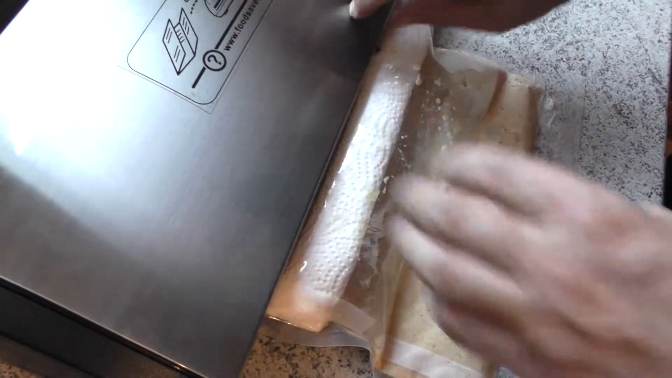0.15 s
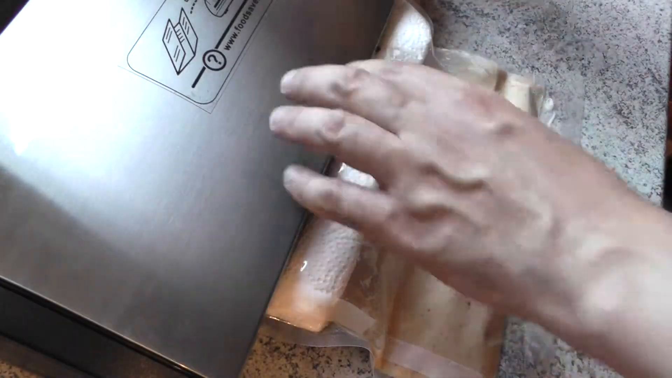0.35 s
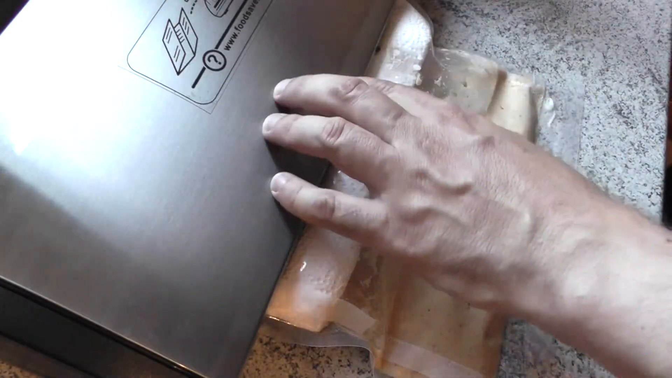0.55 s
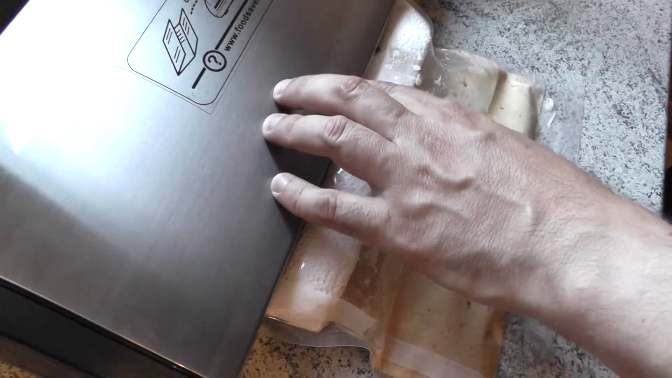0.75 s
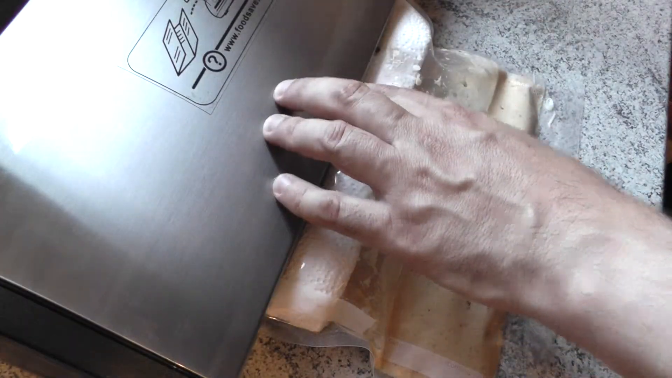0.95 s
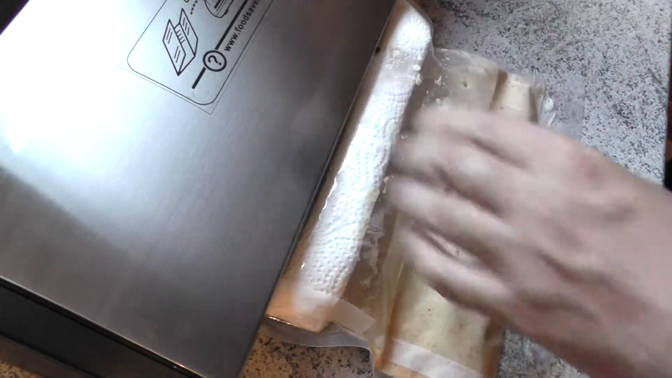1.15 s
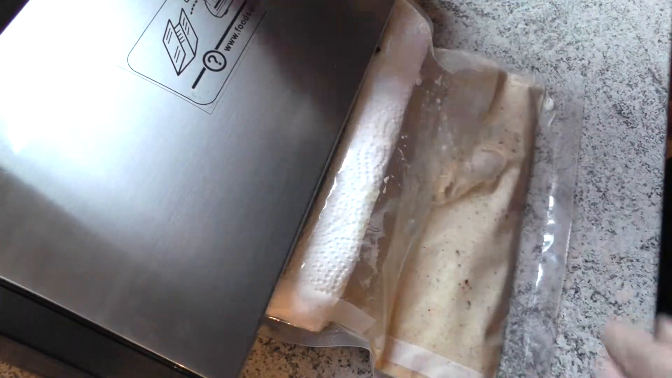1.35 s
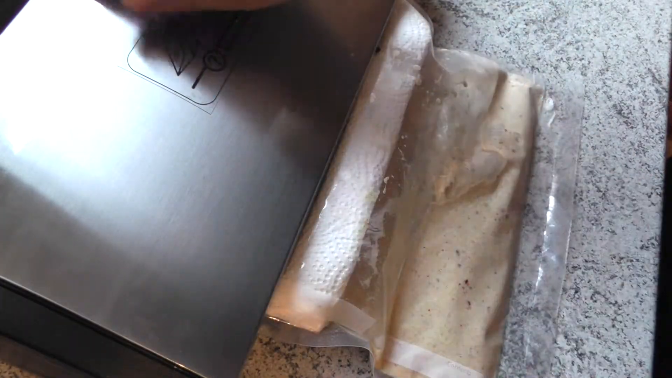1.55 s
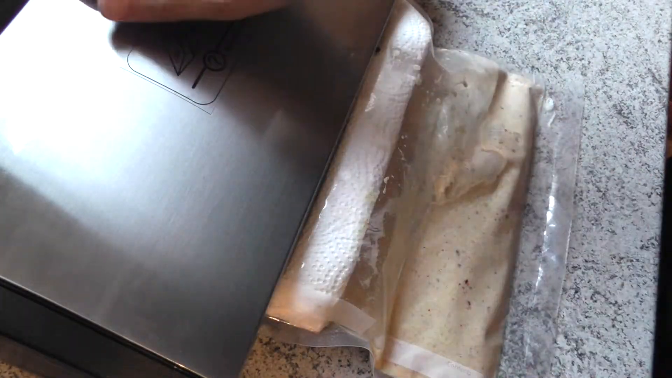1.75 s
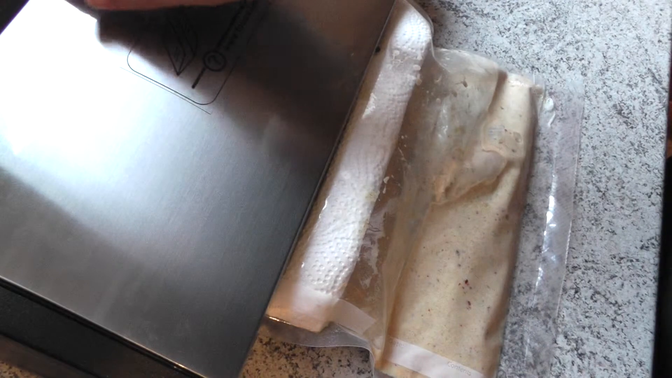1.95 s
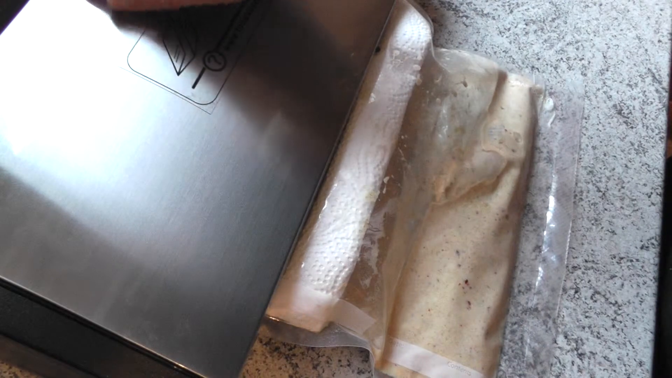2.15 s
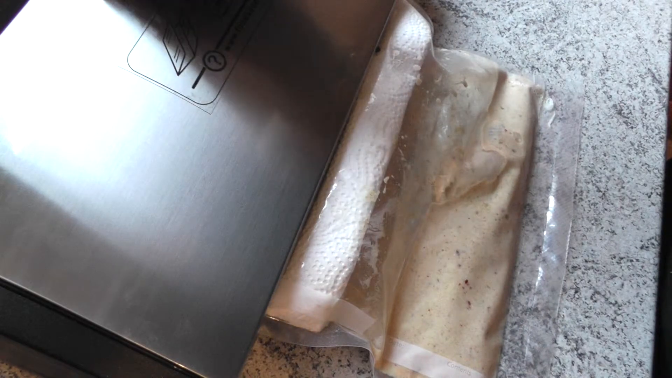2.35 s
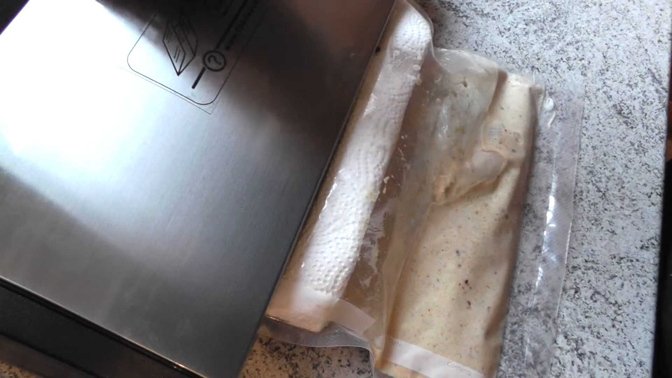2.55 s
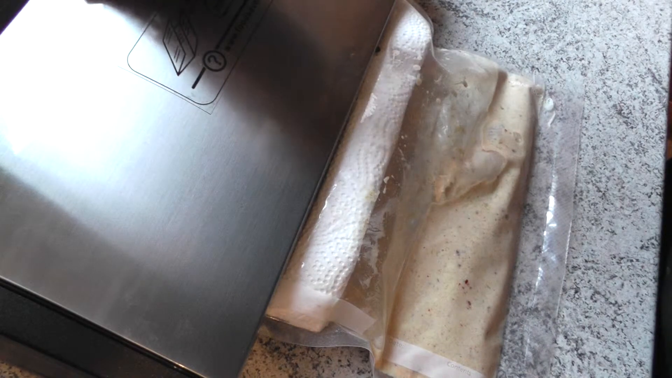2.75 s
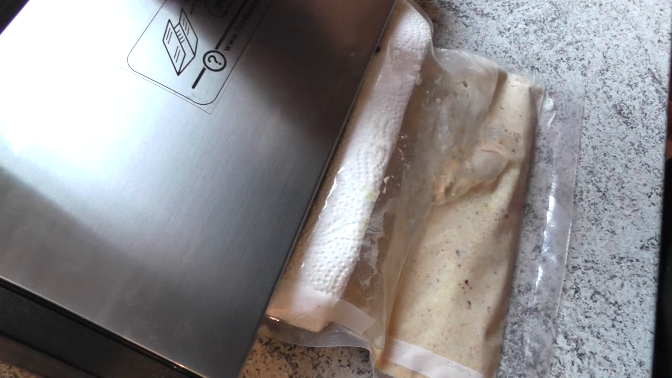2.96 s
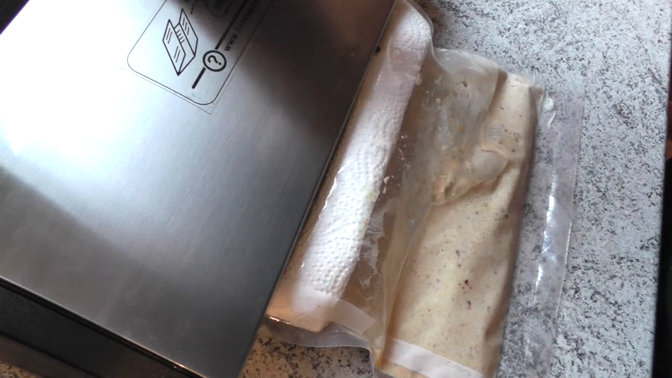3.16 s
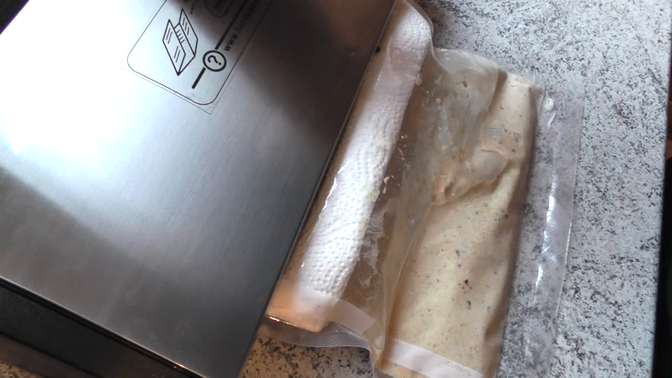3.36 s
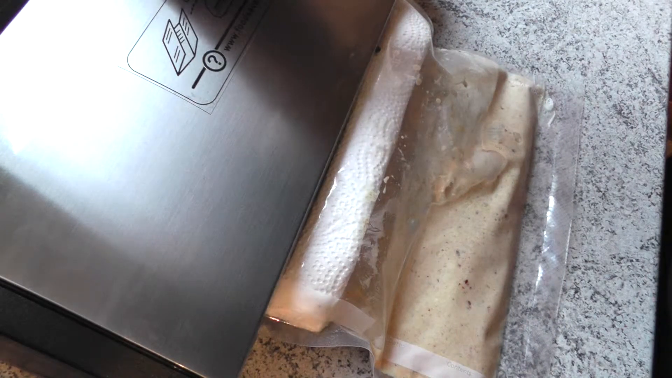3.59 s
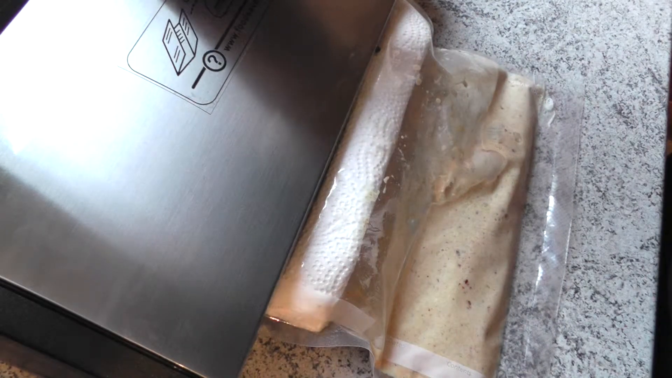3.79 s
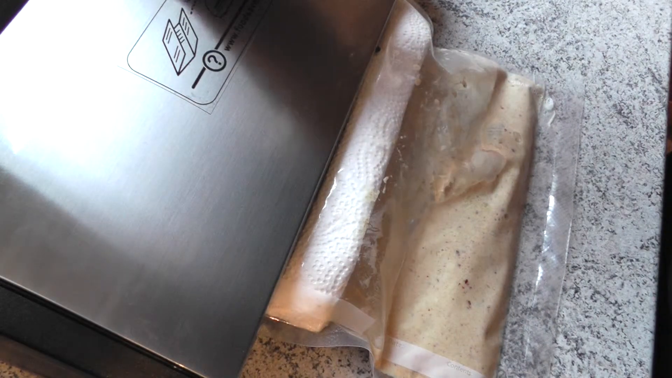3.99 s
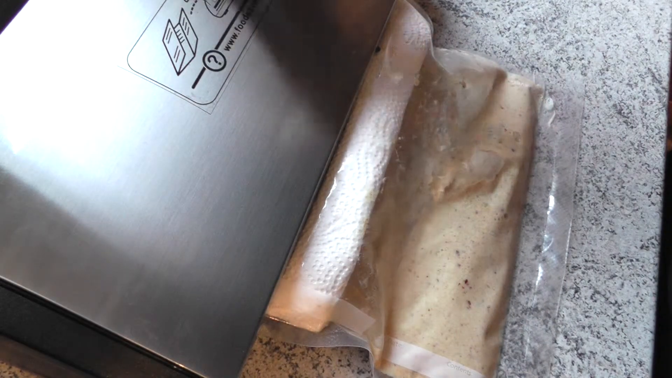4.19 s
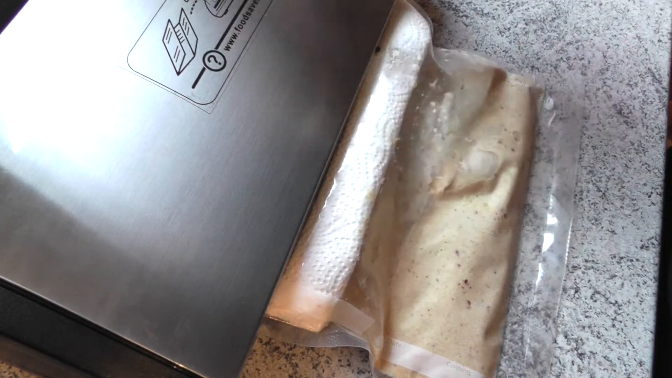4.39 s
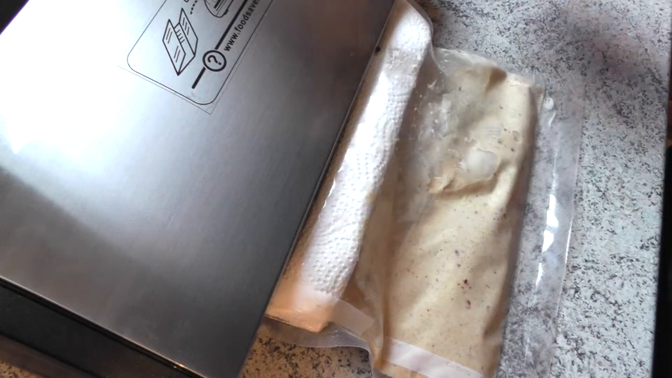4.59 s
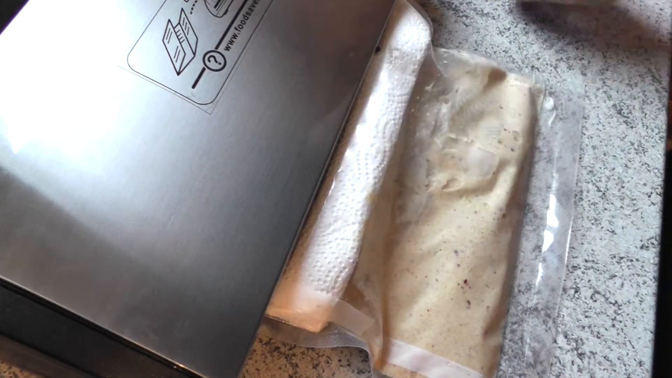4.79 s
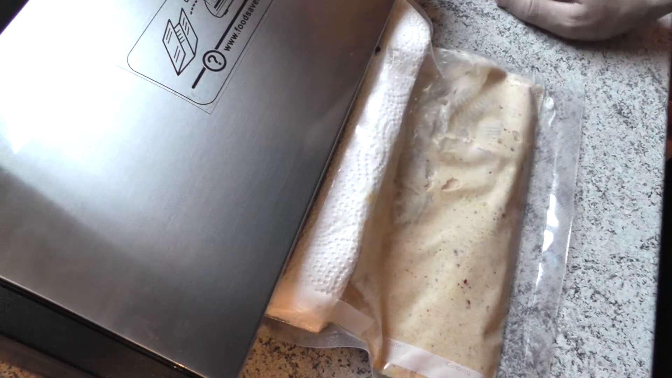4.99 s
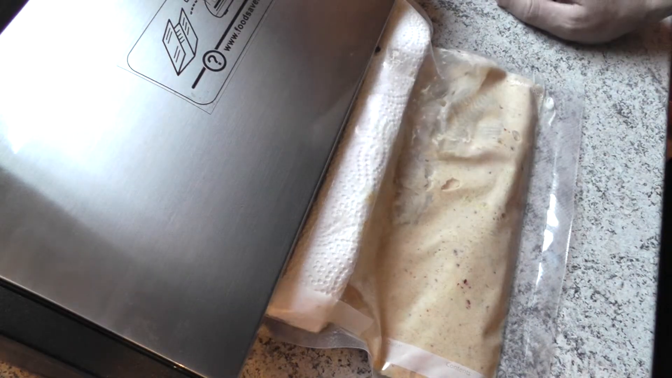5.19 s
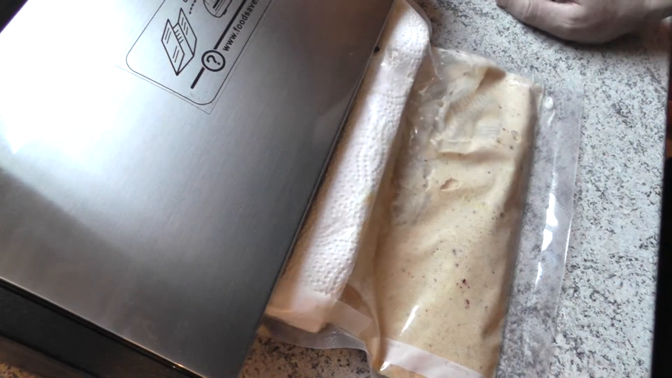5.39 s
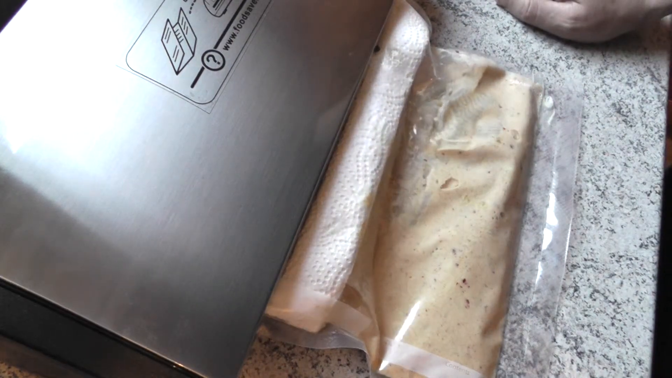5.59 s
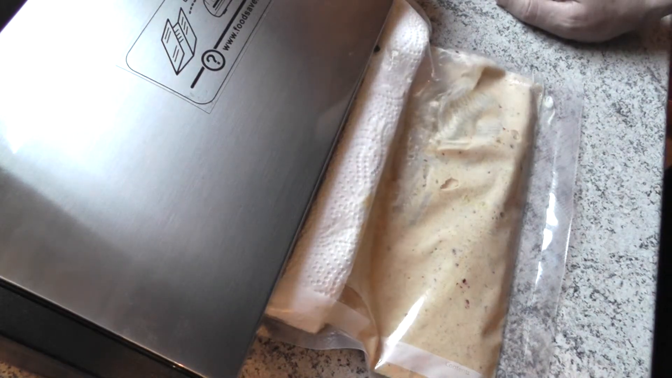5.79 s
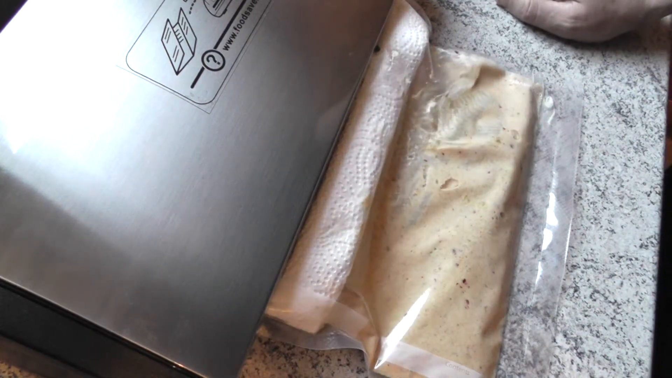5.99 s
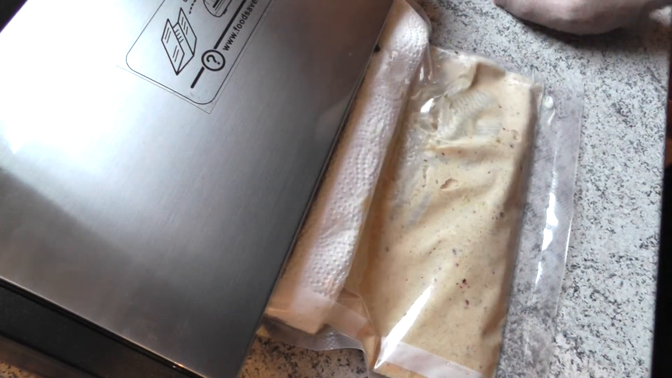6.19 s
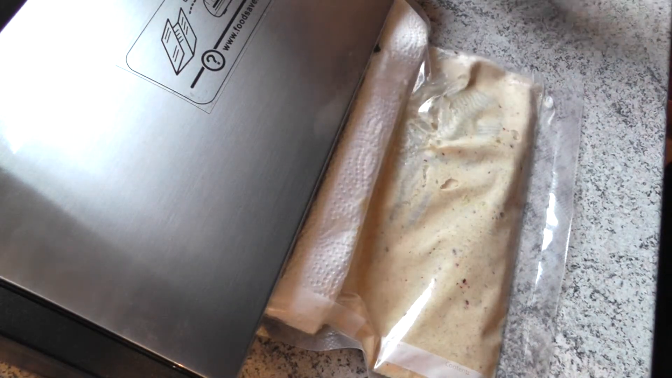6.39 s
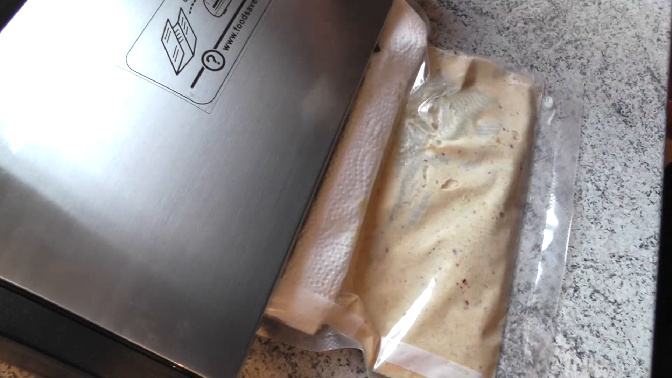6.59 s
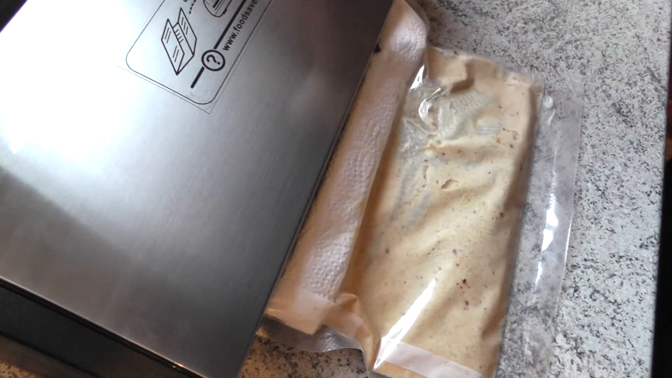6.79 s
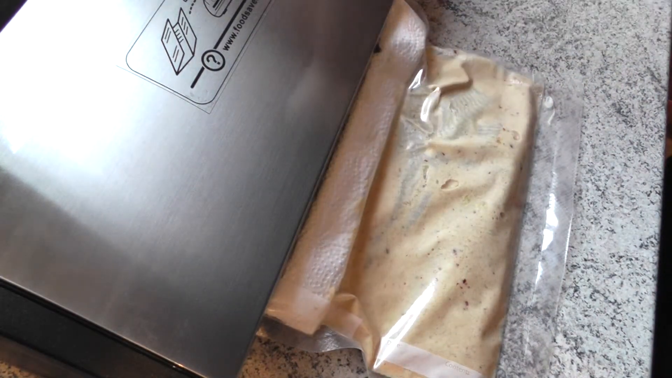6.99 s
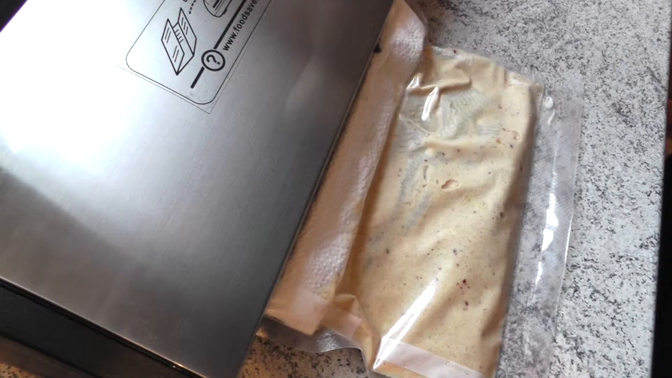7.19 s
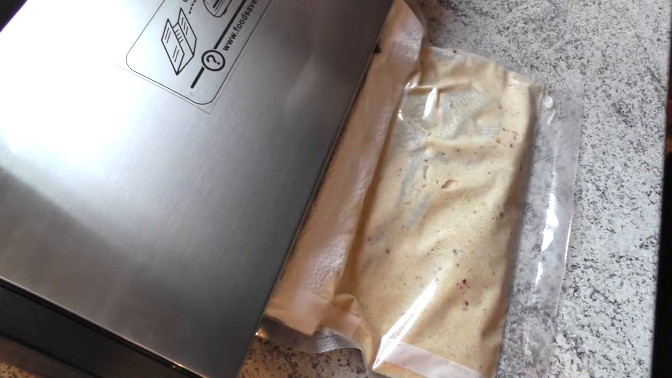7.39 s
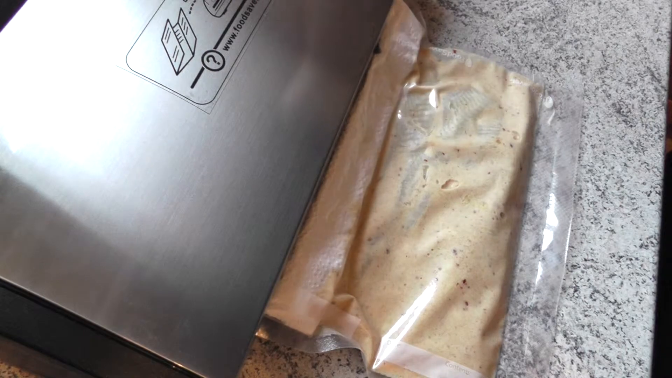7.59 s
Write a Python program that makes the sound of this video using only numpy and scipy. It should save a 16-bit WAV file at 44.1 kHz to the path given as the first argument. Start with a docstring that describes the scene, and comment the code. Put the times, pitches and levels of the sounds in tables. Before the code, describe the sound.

Close microphone in a kitchen with short reverberation and very faint room air. From 0 to 0.7 s a hand shifts and lightly thumps a steel lid. At about 0.7 s comes a bright click, then at 0.87 s the loudest latch snap, hard and woody, with a tiny metallic ping at 0.93 s. Near quiet follows, with small ticks around 1.9-2.1 and 2.7-2.9 s, light skin swishes and a slowly growing low rub. At 3.6 s there is a tick, at 3.75 s a dull low bump, and at 3.84 s the pump starts abruptly: a steady low drone near 38 turns per second, rough with rapid valve clatter, thin motor whine and fluttering exhaust hiss. The airflow sound soon tightens into a drier, slightly louder rattle. A short deep thump hits at 5.4 s. From about 7 s the pump strains, its pitch sagging slightly, buzzing harder until the end at about 7.6 s.

```python
"""Vacuum sealer on a worktop

Close by, a hand presses a steel lid until it latches: damped blows, pings and thumps over rubbing skin.
Then a piston pump starts: modal hum, three valve slaps a turn, motor whine and puffs of exhaust noise.
The strain grows as the bag empties, delaying the slaps, over faint room air and kitchen reverberation."""
import sys
import numpy as np
from scipy import signal
from scipy.fft import rfft, irfft, next_fast_len
from scipy.io import wavfile

SR = 44100
rng = np.random.default_rng(int(sys.argv[2]) if len(sys.argv) > 2 else 0)


def dump(signal):
    """Clip the signal to [-1, 1] and save it as 16-bit WAV at the path in sys.argv[1]."""
    limited = np.clip(np.atleast_2d(signal).T, -1, 1)
    pcm = np.round(limited * 32767).astype(np.int16)
    wavfile.write(sys.argv[1], SR, pcm)


N = 337365
TIME = np.arange(N) / SR
START = 3.8436  # first stroke of the pump, s
# crank speed of the pump: (time [s], speed [turns/s])
SPEED = [(3.84, 37.9), (4.6, 37.9), (5.2, 37.95), (6.5, 37.95), (7.0, 37.89), (7.3, 37.75), (7.65, 37.3)]


def amp(db):
    """Decibel law: a level in dB becomes an amplitude ratio."""
    return 10 ** (np.asarray(db) / 20)


def unit(x):
    """Equal-power reference: scales a signal to rms 1."""
    return x / np.sqrt(np.mean(x ** 2) + 1e-20)


def follow(rows):
    """Linear interpolation: each column of a time curve at every sample."""
    s, *columns = np.transpose(rows)
    return [np.interp(TIME, s, c) for c in columns]


def read(points, hz):
    """Spectral interpolation: joins the points on a log-frequency axis."""
    f, value = np.transpose(points)
    return np.interp(np.log(hz + 1), np.log(f + 1), value)


def colour(x, points):
    """Linear filtering: shapes a spectrum that falls away steeply beyond its end points."""
    size = next_fast_len(len(x))
    hz = np.fft.rfftfreq(size, 1 / SR)
    low_skirt = np.minimum(hz / points[0][0], 1) ** 4
    high_skirt = np.minimum(points[-1][0] / (hz + 1), 1) ** 4
    gain = amp(read(points, hz)) * low_skirt * high_skirt
    return irfft(rfft(x, size) * gain, size)[:len(x)]


def noise(points):
    """Coloured noise: white noise filtered to a given spectrum, at rms 1."""
    return unit(colour(rng.standard_normal(N), points))


def wander(rate_hz):
    """Random modulation: noise under a Gaussian low-pass, rms 1 before interpolation."""
    spectrum = rfft(rng.standard_normal(N // 32))
    hz = np.arange(len(spectrum)) * SR / N
    slow = unit(irfft(spectrum * np.exp(-(hz / rate_hz) ** 2)))
    return np.interp(TIME, np.linspace(0, N / SR, len(slow)), slow)


def add(mix, s, sound):
    """Superposition: adds a sound to the mix from time s."""
    part = mix[max(round(s * SR), 0):][:len(sound)]
    part += sound[:len(part)]


def pump(motor_lead=0.027, jitter=0.00069, loaded_db=1.55, free_db=-0.5):
    """Crank-driven sources: hum, valves and air share one crank phase, while the whine adds drive tones of
    fixed pitch; all vary with flow and strain."""
    flow_fade_s, strain_grow_s = 0.55, 0.27
    full_strain_s = 7.65  # time at which the growing strain reaches 1
    start_strain, start_ease_s = 0.46, 0.038  # the first strokes strain as the piston gets moving
    speed, = follow(SPEED)
    turns = np.cumsum(speed) / SR
    turns = turns - turns[round(START * SR)] + jitter * wander(12)
    running_s = np.maximum(TIME - START, 0)
    flow = np.exp(-running_s / flow_fade_s)
    strain = start_strain * np.exp(-running_s / start_ease_s)
    strain = strain + np.exp((TIME - full_strain_s) / strain_grow_s)
    pumping = np.clip((TIME - START) / 0.0029, 0, 1)
    whining = np.clip((TIME - START + motor_lead) / .004, 0, 1)  # heard just before the first stroke
    works = pumping * exhaust(turns) + clatter(turns, flow, strain) + whining * whine(turns)
    works_db = loaded_db + (free_db - loaded_db) * flow  # louder as the flow dies away
    return pumping * hum(turns, flow, strain) + amp(works_db) * works


def hum(turns, flow, strain, level_db=-25.5, waver_db=1.48, count=38):
    """Modal excitation: two kicks a turn drive housing modes that colour the crank harmonics."""
    # piston kicks: (place [share of a turn], lag at strain 1 [share of a turn],
    # gain at strain 1 [dB], gain at full flow [dB])
    kicks = [(0.133, -0.0034, 2, -2), (0.544, -0.033, 1.7, -2.5)]
    # housing modes: (frequency [Hz], width [Hz], signed swing from first kick [ratio],
    # signed swing from second kick [ratio])
    housing = [(77.4, 35.2, -0.47, -0.41), (101.0, 39.2, 0.91, 0.25), (260, 20, 0.013, 0.12),
               (355.2, 55, 0.25, -0.49), (416, 97, 0.071, 0.63), (491.4, 29.3, -0.63, 0.56),
               (584.8, 16.9, 0.35, 0.58), (679.6, 183, -0.88, -0.069), (715.4, 114.7, 1.315, 0.048),
               (936.5, 11, 0.2, -0.42), (1022, 22.7, 0.228, -0.24), (1136, 35, 0.26, -0.31),
               (1150, 14, -0.064, 0.334), (1382, 180, 0.00097, -0.011)]
    out = np.zeros(N)
    ring_hz, width_hz, *swings = np.transpose(housing)
    hz = np.arange(1, count + 1)[:, None] * SPEED[2][1]
    modes = 1 / (1 + 1j * (hz ** 2 - ring_hz ** 2) / (hz * width_hz))
    waver = [amp(waver_db * wander(1.5)) for _ in range(count)]
    for (share, lag, strain_db, flow_db), swing in zip(kicks, swings):
        crank = np.exp(2j * np.pi * (turns - share - lag * strain))
        harmonic = amp(strain_db * strain + flow_db * flow)
        for answer, gain in zip(modes @ swing, waver):
            harmonic = harmonic * crank  # one harmonic higher
            out += gain * (answer * harmonic).real
    return amp(level_db) * out


def clatter(turns, flow, strain, level_db=-32, edge_db=-2, wet_db=-5, uneven=0.073):
    """Periodic impacts: valve flaps slap at set crank angles, later and with more edge under strain."""
    # valve slaps: (place [share of a turn], relative level [dB], decay [s],
    # lag at strain 1 [share of a turn])
    slap_rows = [(0.041, -5.5, 0.0011, 0.0477), (.13, -6, 0.0016, 0.0376), (.51, -12, .0009, 0.022)]
    # rattle near vacuum: (frequency [Hz], relative level [dB])
    loaded_spectrum = [(1250, -8), (1400, -4.5), (1700, -6.5), (1950, -2.5), (2250, -7.5), (2500, -13),
                       (2850, -5.5), (3150, -7.5), (3500, -13), (3800, -12.5), (4300, -17.5), (5400, -22.5),
                       (6500, -23.5), (7000, -24)]
    # rattle while air flows freely: (frequency [Hz], relative level [dB])
    free_spectrum = [(1250, 6.5), (1550, -9), (1900, -9.5), (2300, -8.5), (2900, -13.5), (3300, -10.5),
                     (3800, -5), (4300, -24.5), (5400, -25.5), (7000, -22.5)]
    slaps, t = np.zeros(N), np.arange(SR // 40) / SR
    for share, db, decay, lag in slap_rows:
        angle = turns - share - lag * strain
        offset = ((angle + .5) % 1 - .5) * SR / SPEED[2][1]  # samples from the nearest slap
        pulses = np.exp(-offset ** 2 / 2) * (angle > -.5) * (1 + uneven * wander(40))
        slap = unit(rng.standard_normal(len(t)) * t * np.exp(-t / decay))  # swells, then dies
        slaps += amp(db) * signal.oaconvolve(pulses, slap)[:N]
    slaps = slaps + amp(wet_db) * kitchen(slaps)
    out = flow * colour(slaps, free_spectrum) + (1 - flow) * colour(slaps, loaded_spectrum)
    out += amp(edge_db) * strain ** 2 * colour(slaps, [(2200, -11), (3100, -3), (4000, -28)])
    return amp(level_db) * out / np.std(out[TIME > START])


def whine(turns, waver=0.045, brush_db=-47):
    """Tonal machine noise: crank multiples and fixed drive tones over the hiss of the brushes."""
    # motor tones: (multiple of crank speed [ratio], relative level [dB])
    motor = [(100, -51.5), (108, -60.5)]
    # drive whistles of fixed pitch: (frequency [Hz], relative level [dB])
    drive = [(1972, -36), (5728, -58), (5916, -58.5)]
    tones = [(round(k) * turns, db) for k, db in motor]
    tones += [(hz * TIME, db) for hz, db in drive]
    lines = np.zeros(N)
    for cycles, db in tones:
        wavering = 1 + waver * wander(19)
        lines += amp(db) * np.sqrt(2) * wavering * np.cos(2 * np.pi * cycles)
    brushes = noise([(400, 2.5), (1000, -11), (2000, -17), (4000, -10.5), (7000, -21), (15000, -18.0)])
    return lines + amp(brush_db) * brushes


def exhaust(turns, hiss_db=-46, rush_db=-45, flutter_db=1, whistle_flutter_db=3):
    """Modulated flow noise: the crank gates hiss and narrow-band whistles over a low rush of air."""
    # exhaust hiss: (frequency [Hz], relative level [dB])
    hiss_spectrum = [(3000, 7.5), (5000, -7), (6500, -8), (7300, -6), (8500, 0.5), (9200, -14),
                     (10300, -11.5), (11000, 1.5), (13100, -13), (14000, -2), (14400, -22), (15800, -25)]
    # air flow over one turn: (place [share of a turn], relative level [dB])
    puff_curve = [(.05, -13), (.16, 0), (.32, 1), (.45, -5), (.55, -4), (.64, -13)]
    # faint fluttering outlet whistles: (frequency [Hz], width [Hz], relative level [dB])
    whistles = [(7190, 300, -59), (7550, 87, -53), (8630, 350, -58.5), (13500, 330, -67), (13800, 220, -58)]
    share, flow_db = np.transpose(puff_curve)
    puffs = amp(np.interp(turns % 1, share, flow_db, period=1) + flutter_db * wander(50))
    rush = noise([(40, -7), (125, -11), (220, -13), (480, 4), (1000, 5),
                  (1900, -8), (2400, -37), (3000, -2), (4500, -14)])
    air = amp(hiss_db) * noise(hiss_spectrum)
    for hz, width, db in whistles:
        whistle = signal.lfilter(*signal.iirpeak(hz, hz / width, SR), rng.standard_normal(N))
        air += amp(db + whistle_flutter_db * wander(25)) * unit(whistle)
    return puffs * air + np.sqrt(puffs) * amp(rush_db) * rush


def knocks(crack=3):
    """Impact response: a crack and short noise rattle excite the case; heavy is deeper, hard brighter."""
    # knocks and ticks on lid and case: (time [s], peak level [dB], weight as bass gain [dB],
    # hardness as treble slope [dB/octave], decay [s])
    blow_rows = [(0.249, -42.5, 9, -7, 0.0073), (0.529, -40.5, -16, -5, 0.0023),
                 (0.564, -34.5, 3, 0.5, 0.0043), (0.6, -36, 2, -2, 0.014), (0.713, -15.5, 3, 4.5, 0.0046),
                 (0.82, -27, 9, 1, 0.0031), (0.865, -25, 21, 4, 0.0058), (0.871, -9.5, -16.5, -4, 0.0034),
                 (0.874, -7.5, -14.5, -2, 0.0032), (0.928, -20, -34, 2.5, 0.0019),
                 (1.872, -39, -4, 2, 0.0037), (1.915, -48, 4, 8, 0.0023), (2.007, -37, -6, 3.5, 0.0034),
                 (2.074, -36.5, -2, -0.3, 0.012), (2.675, -24.5, -6, 1.5, 0.0034),
                 (2.756, -37, -3, -4, 0.0028), (2.837, -31.5, -9, -17, 0.0039),
                 (2.873, -36, -2, -1, 0.0048), (3.614, -27, 1.5, 4.5, 0.0049),
                 (3.818, -21, -1, -14, 0.0025)]
    # case resonances: (frequency [Hz], width [Hz], gain [dB])
    case = [(320, 40, 2), (690, 430, 7.5), (1480, 150, 3.5), (1850, 180, 6.5), (2400, 180, 4.5),
            (3900, 500, -3)]
    # colour of a middling blow: (frequency [Hz], relative level [dB])
    blow_colour = [(40, -14), (250, 1), (1200, -9), (4000, -12), (9000, -30), (16000, -35.5)]
    out, size = np.zeros(N), 4096
    t, hz = np.arange(size) / SR, abs(np.fft.fftfreq(size, 1 / SR))
    case_db = read(blow_colour, hz)
    for f, width, db in case:
        case_db = case_db + db / (1 + (2 * (hz - f) / width) ** 2)
    bass = read([(250, 1), (1200, 0)], hz)
    octaves = np.log2(np.clip(hz, 1200, 9000) / 1200)
    for s, peak_db, weight_db, hardness, decay in blow_rows:
        log_gain = np.log(amp(case_db + weight_db * bass + hardness * octaves))
        response = np.exp(np.conj(signal.hilbert(log_gain)))  # minimum phase: a causal ring
        blow = rng.standard_normal(size) * np.exp(-t / max(decay, .0002))
        blow[0] = crack
        sound = np.fft.ifft(np.fft.fft(blow) * response).real
        add(out, s, amp(peak_db) * sound / abs(sound).max())
    return out


def rings(rows):
    """Damped oscillation: decaying sines that build up over about their first half cycle."""
    out, t = np.zeros(N), np.arange(SR // 5) / SR
    for s, hz, db, decay in rows:
        build_up = 2 * (1 - np.exp(-2 * hz * t))
        add(out, s, amp(db) * np.sin(2 * np.pi * hz * t) * np.exp(-t / decay) * build_up)
    return out


def hands(lumpy_db=2.5):
    """Friction noise: skin leans and shifts on the case as lumpy rumble, dry rub and light swishes."""
    # rumble, rub, leaning rub and swish spectra, each: (frequency [Hz], relative level [dB])
    rumble_spectrum, rub_spectrum = [(15, -39), (25, -17), (53, 3.5), (91, 2), (177, -8.5), (297, -6.5),
                                     (343, -13), (454, -33), (600, -37.5), (780, -56), (1320, -120)], [(300, -8), (380, 2.5), (520, -10), (700, -4.5),
                                                     (850, -11.5), (1150, -14.5), (1700, -15),
                                                     (2100, -20.5), (2400, -28), (3100, -24.5), (3600, -22),
                                                     (4300, -31), (7000, -39)]
    lean_spectrum, swish_spectrum = [(500, -8.5), (720, 2), (850, -6), (1700, -6.5), (2100, -8.5),
                                     (2400, -24.5), (3500, -18.5), (4500, -25), (7000, -34.5)], [(3000, 0), (5000, -4), (11000, -2.5), (15000, 0),
                                                       (16000, -18)]
    # brief shifts of hands and shaken case: (time of peak [s], rumble level [dB], rub level [dB])
    shifts = [(.01, -48, -43), (.55, -56, -68), (.78, -58, -43), (.9, -51, -46), (1.06, -63, -54),
              (2.11, -53, -64), (2.49, -63.5, -64), (3.12, -55, -65), (3.74, -28, -42), (3.92, -29.5, -52)]
    # swishes of skin on steel: (time of peak [s], level [dB], half length [s])
    swishes = [(2.498, -64.5, 0.023), (2.947, -61.5, 0.091), (3.2, -68, .015)]
    # the lean grows steadily in dB until the pump starts
    lean_rumble_db, lean_rub_db = -38, -53.5
    rumble_growth, rub_growth = 12.5, 15  # dB per s
    ahead_s = np.maximum(START - TIME, 0)
    letting_go = np.where(TIME < START, 1, swell(START))
    rumble = letting_go * amp(lean_rumble_db - rumble_growth * ahead_s)
    lean = letting_go * amp(lean_rub_db - rub_growth * ahead_s) * noise(lean_spectrum)
    rub = 0
    for s, rumble_db, rub_db in shifts:  # powers add
        rumble = np.hypot(rumble, amp(rumble_db) * swell(s))
        rub = np.hypot(rub, amp(rub_db) * swell(s))
    lumps = unit(amp(lumpy_db * wander(35)))
    swish = sum(amp(db) * np.exp(-((TIME - s) / half) ** 2) for s, db, half in swishes)
    skin = rumble * noise(rumble_spectrum) + rub * noise(rub_spectrum) + lean
    return lumps * skin + swish * noise(swish_spectrum)


def swell(s, rise_s=0.073, fade_s=0.076):
    """Exponential envelope: a movement builds up to its peak at time s and dies away."""
    return np.exp(np.minimum((TIME - s) / rise_s, (s - TIME) / fade_s))


def kitchen(x):
    """Diffuse reverberation: dense random reflections, each band decaying at its own rate."""
    # reverberation by band: (frequency [Hz], 60 dB decay time [s], relative level [dB])
    bands = np.array([(100.2, 0.43, -1), (408, 0.35, 7), (2070, 0.42, -2), (4180, 0.45, -5.5),
                      (5190, 0.32, -3), (8000, 0.095, -4), (15100, 0.6, -3.5)])
    taps = rng.standard_normal(SR) * (np.arange(SR) > .004 * SR)  # silent for the first 4 ms
    hz, t, z = signal.stft(taps, SR, nperseg=256)
    t60 = read(bands[:, [0, 1]], hz)[:, None]
    db = read(bands[:, [0, 2]], hz)[:, None]
    tail = signal.istft(z * amp(db - 60 * t / t60), SR, nperseg=256)[1]
    return signal.fftconvolve(x, tail / np.linalg.norm(tail))[:N]


def tone(hz, db):
    """Pure tone: a steady sine of given rms level."""
    return amp(db) * np.sqrt(2) * np.sin(2 * np.pi * hz * TIME)


def floor(level_db=-63.5, wake_s=.93, wake_db=-79):
    """Stationary background: room-air noise and a high whine, joined by electronics as the lid latches."""
    # room air: (frequency [Hz], relative level [dB])
    air_spectrum = [(15, -39.5), (25, -8), (86, -0.5), (189, -9), (307, -10.5), (540, -22), (707, -17.5),
                    (809, -22), (1680, -23.5), (2950, -28.5), (3290, -26), (9930, -37), (12000, -34.5),
                    (15700, -36.5)]
    # faint steady whine of the electronics: (frequency [Hz], level [dB])
    electronics = [(14379, -91)]
    # thin hiss of the electronics: (frequency [Hz], relative level [dB])
    hiss_spectrum = [(10500, -7), (11300, 0), (12300, -2), (13000, -15)]
    awake = sum(tone(hz, db) for hz, db in electronics) + amp(wake_db) * noise(hiss_spectrum)
    return amp(level_db) * noise(air_spectrum) + tone(15622, -84.5) + (TIME > wake_s) * awake


def scene(knock_wet_db=-11, latch_wet_db=-8, thump_wet_db=-17):
    """Superposition: pump, blows and hands over the floor, with the kitchen answering the blows."""
    # pings of the latch springs: (time [s], frequency [Hz], nominal level [dB], decay [s])
    latch = [(.8215, 5370, -36, 0.002), (.929, 3770, -23.5, 0.0016), (.929, 4020, -31, 0.0033)]
    # thumps of lid and bag, and the jolt of the case as the pump starts:
    # (time [s], frequency [Hz], nominal level [dB], decay [s])
    thump_rows = [(.06, 386, -54, 0.011), (.155, 356, -48.5, 0.011), (.53, 84.5, -58, 0.013),
                  (.635, 402, -45.5, 0.012), (.871, 244, -16, 0.005), (.877, 340, -16, 0.0057),
                  (.884, 58, -35.5, .012), (1.3, 129, -51, 0.007), (3.742, 296, -24.5, 0.0088),
                  (3.766, 112, -15, 0.014), (3.775, 193, -24.5, .012), (2.833, 105, -44, 0.0063),
                  (2.972, 80, -39, 0.011), (3.82, 740, -35.5, 0.012), (3.846, 1190, -33, 0.07),
                  (5.375, 114, -11, 0.0074), (5.377, 225, -12.5, 0.0052), (5.382, 62.4, -16, 0.013)]
    blows, pings, thumps = knocks(), rings(latch), rings(thump_rows)
    room = kitchen(amp(knock_wet_db) * blows + amp(latch_wet_db) * pings + amp(thump_wet_db) * thumps)
    return (pump() + blows + pings + thumps + hands() + room + floor())[None]


def record(dry, edge_hz=15800):
    """Band limiting: a linear-phase low-pass removes the highest treble."""
    low_pass = signal.firwin(511, edge_hz, window=("kaiser", 9), fs=SR)
    return signal.oaconvolve(dry, low_pass[None], "same")


dry = scene()
out = record(dry)
dump(out)
```